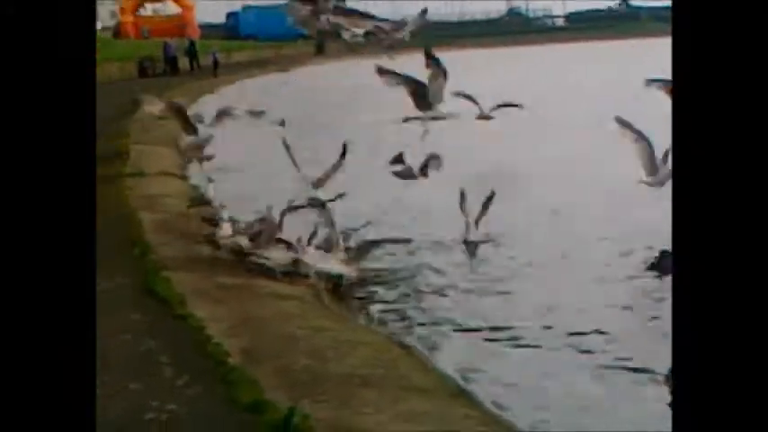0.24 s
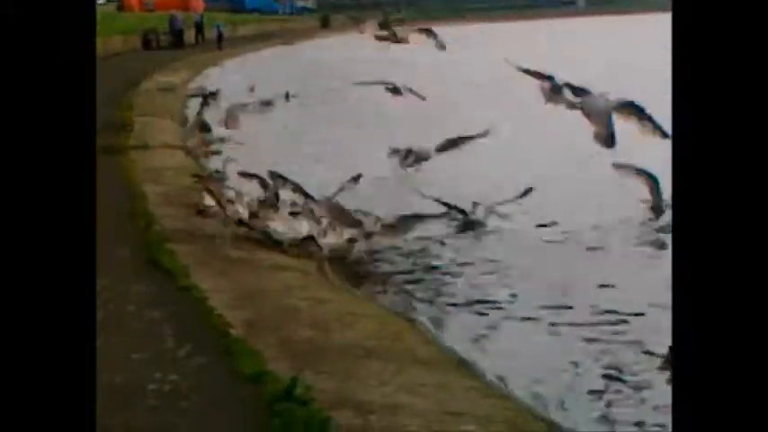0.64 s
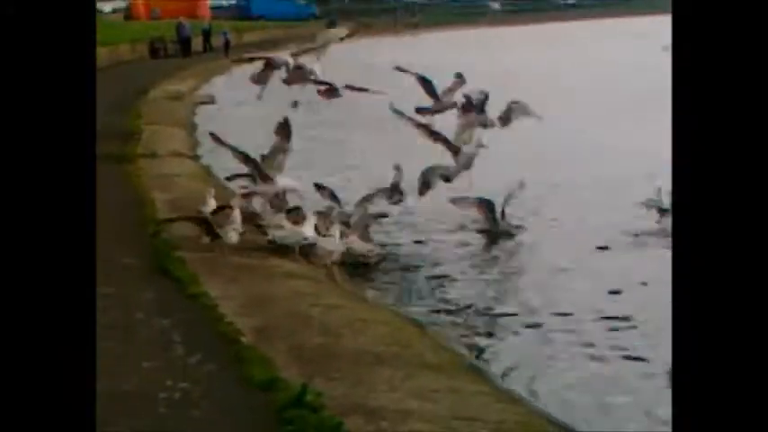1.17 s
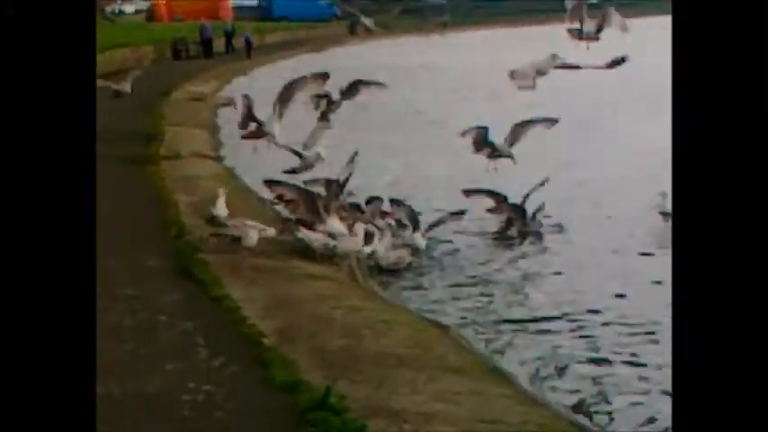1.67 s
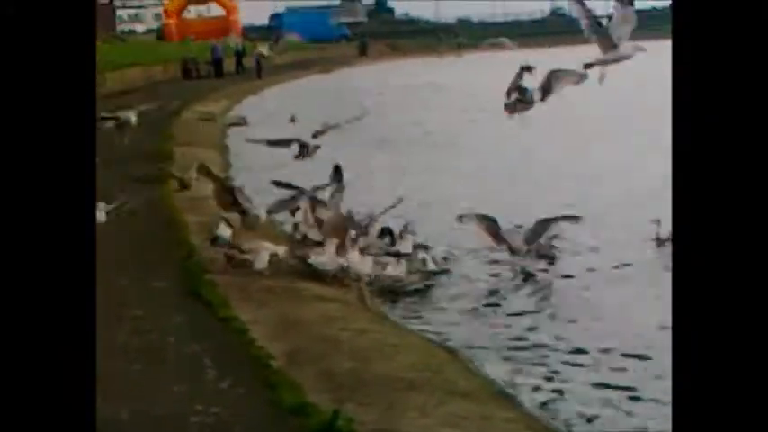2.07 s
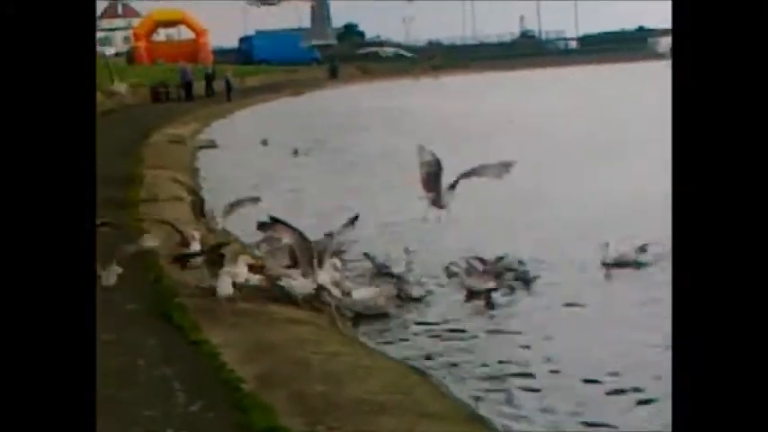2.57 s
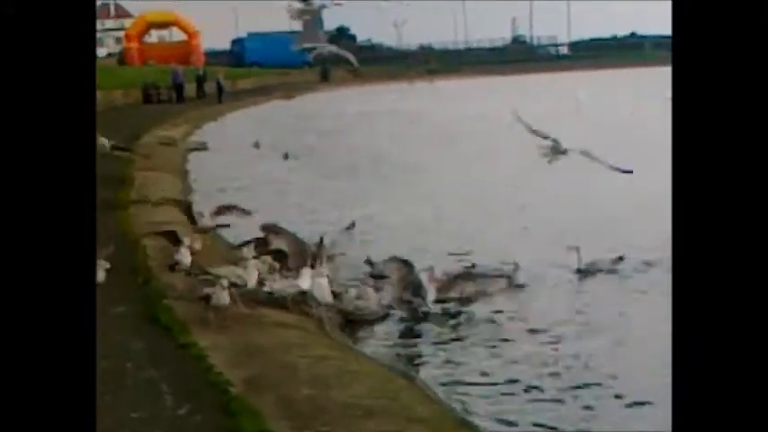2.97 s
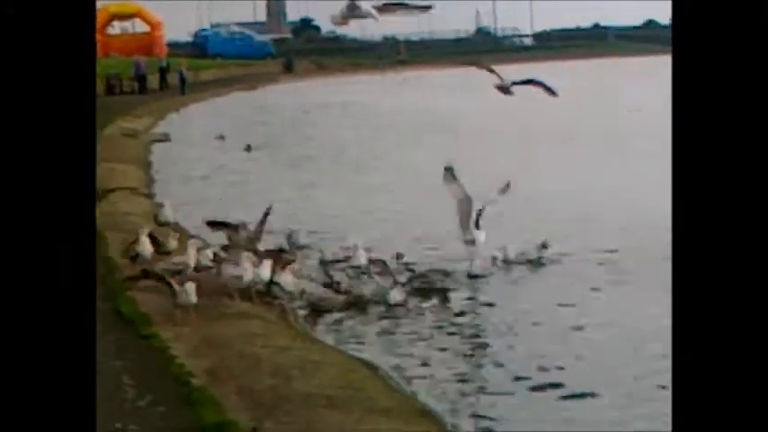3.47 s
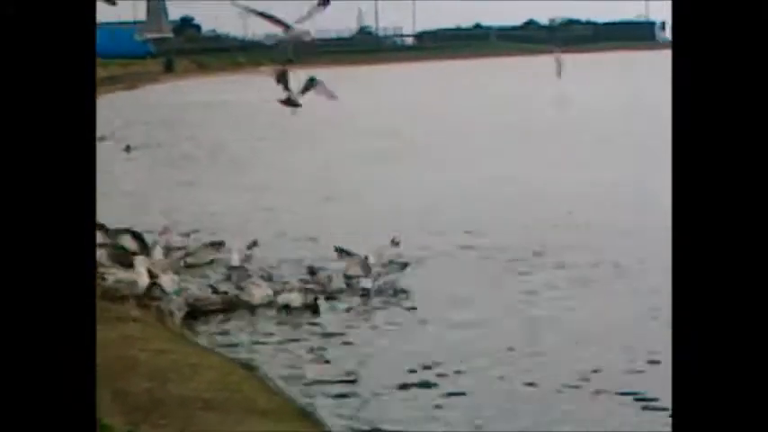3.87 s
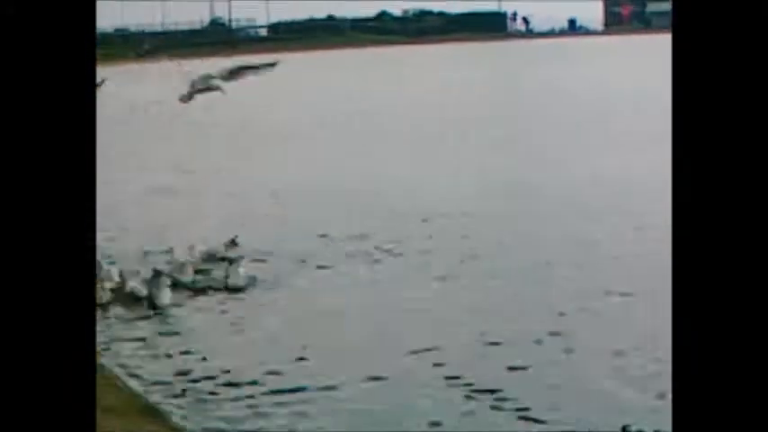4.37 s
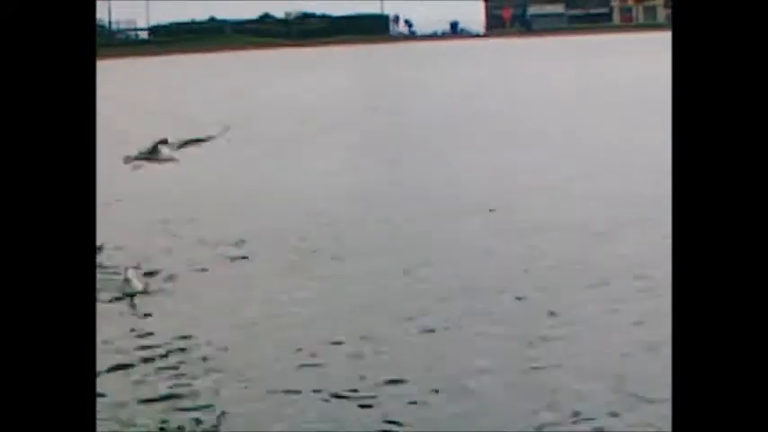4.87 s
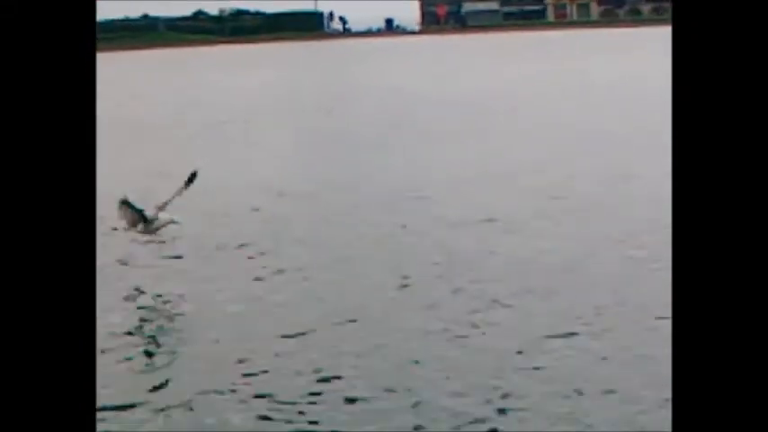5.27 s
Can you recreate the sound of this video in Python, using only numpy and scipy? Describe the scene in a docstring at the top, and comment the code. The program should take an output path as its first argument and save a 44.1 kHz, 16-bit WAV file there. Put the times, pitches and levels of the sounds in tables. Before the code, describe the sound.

Gulls squabble in harsh, raspy squawks and bending wails at a windy lakeside, while gusts rumble and thump heavily on the microphone.

```python
"""Edge of a lake, microphone out in the wind: a flock of gulls squabbles over food above splashing water.
Squawks and wails are sums of partials that break into half tones and rasp; young birds whistle in thin,
nearly pure notes, over a faint, fast warbling tone. Spray, wash and the further flock are coloured noise.
Gusts rumble and flutter as noise and thump on the microphone as single pushes. The birds bounce off the
water and echo from the far bank."""
import sys
import numpy as np
from scipy import signal
from scipy.fft import rfft, irfft, next_fast_len
from scipy.io import wavfile
from scipy.ndimage import uniform_filter1d

SR = 44100
rng = np.random.default_rng(int(sys.argv[2]) if len(sys.argv) > 2 else 0)


def wav_record(signal):
    """Record a signal, one row per channel, as 16-bit PCM in the file named by sys.argv[1]."""
    frames = np.transpose(np.atleast_2d(signal))
    bounded = np.clip(frames, -1, 1)
    # unit amplitude maps onto the largest positive 16-bit level
    quanta = np.round(bounded * 32767).astype(np.int16)
    wavfile.write(sys.argv[1], SR, quanta)


N = 243431
TIME = np.arange(N) / SR

# wind on the microphone between gusts, before BREEZE_DB: time_s, level_db
BREEZE_LEVEL = [(0.0, -19), (0.37, -22.5), (0.57, -26), (1.14, -24.5), (1.83, -23), (1.98, -23),
                (2.2, -31.5), (2.34, -18), (2.54, -22), (2.74, -22.5), (3.38, -21.5), (3.98, -35.5),
                (4.15, -30), (4.49, -23), (4.7, -29), (5.24, -29.5), (5.41, -21), (5.52, -32)]
# gusts, before PUFF_DB: start_s, length_s, level_db
GUSTS = [(0.009, 0.0505, -15.5), (0.203, 0.201, -13), (0.426, 0.0807, -13), (0.528, 0.054, -13.5),
         (0.756, 0.1428, -14), (0.958, 0.091, -14.5), (1.245, 0.0358, -17.5), (1.391, 0.18, -16.5),
         (1.572, 0.052, -15), (1.788, 0.1476, -13), (2.241, 0.0424, -13), (2.323, 0.218, -15),
         (2.601, 0.16, -13.5), (2.902, 0.083, -16), (3.011, 0.0278, -7.5), (3.281, 0.302, -18.5),
         (3.823, 0.0405, -16), (4.324, 0.192, -15.5), (5.241, 0.1106, -14)]
BREEZE_DB, PUFF_DB = 1.5, 0  # gain of the breeze and of the gusts
PUFF_RISE_S, PUFF_FALL_S = 0.0067, 0.02966
# spectrum of the large eddies: frequency_hz, relative_level_db
RUMBLE_COLOUR = [(8.8, -41.5), (15, 6.5), (33, 2), (73, 0.5), (300, -23.5), (390, -45), (660, -120)]
# spectrum of the small eddies: frequency_hz, relative_level_db
FLUTTER_COLOUR = [(60,1),(115,7),(230,-1),(340,-6.5),(450,-14.5),(700,-20),(1400,-39.5),(3000,-85.5)]
# birds thrashing in the water, before the gain in spray(): time_s, level_db
SPRAY_LEVEL = [(0.04, -74.5), (0.11, -75), (0.63, -72.5), (0.74, -68.5), (1.06, -81), (1.12, -71),
               (1.88, -65.5), (2.65, -88), (2.68, -75), (2.96, -95.5), (3.86, -77), (3.93, -86),
               (4.71, -73), (5.19, -82), (5.22, -63.5), (5.5, -66.5)]
# spectrum of the spray: frequency_hz, relative_level_db
SPRAY_SPECTRUM = [(900,10.5),(2300,15.5),(4000,16),(6000,7.5),(8500,4),(11000,-3.5),(15500,-9)]
# wash of water and the further flock: time_s, level_db
SHORE_LEVEL = [(0,-43),(.6,-40),(1,-48),(1.5,-35.5),(2.2,-45),(2.6,-43),(3.1,-51.5),(3.5,-39),(3.85,-39.5),(4.3,-44),(4.8,-37),(5.1,-44.5),(5.52,-33.5)]
# spectrum of the wash and the further flock: frequency_hz, relative_level_db
SHORE_SPECTRUM = [(200,-16),(500,2),(900,-2.5),(1400,8),(2300,2.5),(3200,-8),(4200,-20),(5500,-37),(9000,-35)]
# throat colour shared by all the gulls: frequency_hz, relative_level_db
THROAT_COLOUR = [(500,-37),(900,-17.5),(1200,-3.5),(1600,4.5),(2600,-0.5),(3600,-7),(4300,-15),(4900,-26.5),(5600,-22),(6600,-40),(8000,-34.5),(10000,-52),(15000,-59.5)]
# how the voice breaks up: strain_0_to_1, half_tones_db, roughness_0_to_1
VOICE_BREAKUP = [(0,-33,.02),(.3,-17,.07),(.5,-5,.13),(.7,0,.3),(1,0,.8)]
# squawks: start_s, length_s, time_to_crest_s, crest_pitch_hz, late_pitch_hz (before the droop),
# crest_level_db, level_change_after_crest_db, crest_strain_0_to_1, late_strain_0_to_1,
# throat_resonance_hz, treble_db
SQUAWKS = [ (0, 0.0645, 0.00366, 1375, 1184, -25.5, -26.5, 0.81, 1, 2812, 3),
           (0.33, 0.163, 0.0762, 1249, 1213, -29, -10.5, 0.49, 0.58, 2470, 2),
           (0.496, 0.184, 0.012, 1164, 1144, -28, -7, 0.43, 1, 2123, -1.5),
           (0.618, 0.085, 0.0424, 1477, 1383, -31, -5, 0.8, 0.75, 2494, 1),
           (0.689, 0.0908, 0.0344, 1571, 1325, -25, 4, 0.41, 0.39, 2820, 6.5),
           (0.774, 0.0412, 0.0222, 1035, 1089, -25.5, -6.5, 0.55, .15, 1983, 3),
           (1.061, 0.028, 0.0125, 1427, 1760, -28, -3.5, 0.36, 0.73, 1490, 1.5),
           (1.079, 0.0695, 0.0043, 1264, 1031, -32, -1, 0.07, 0.12, 1774, 0.5),
           (1.2, .163, 0.0435, 1545, 1454, -25.5, 3, 0.47, 0.5, 1791, 4),
           (1.3, 0.1925, 0.0543, 1131, 1008, -26, 2, 0.49, 0.71, 2205, 4.5),
           (1.363, 0.033, 0.0136, 1081, 1085, -25, -14.5, 0.1, .4, 2200, -10.5),
           (1.391, 0.1175, 0.0107, 1406, 1449, -24, -2, 0.38, 0.69, 3203, -1),
           (1.473, 0.1014, 0.00755, 1305, 1458, -19, -10.5, 0.65, 0.48, 2526, 2),
           (1.531, 0.1745, 0.0798, 1380, 1347, -27, 0, 0.8, 0.88, 1843, 2.5),
           (1.661, 0.028, 0.0081, 1900, 1600, -22.5, -3, 0.38, .5, 1810, -12.5),
           (1.727, 0.183, 0.029, 1377, 1390, -25, -4, 0.53, 0.66, 1667, 2.5),
           (1.927, 0.0617, 0.01125, 1282, 1253, -22, 0.5, 0.47, 0.71, 1920, 6),
           (1.968, 0.2309, 0.0857, 1478, 1458, -25, -2.5, 0.79, 0.95, 2535, -3),
           (2.238, 0.0462, 0.0157, 1409, 1374, -25.5, -15, 0.76, 0.6, 2700, -5),
           (2.267, 0.173, 0.0281, 1295, 1195, -28, -5.5, 0, 0.44, 2803, 1),
           (2.338, 0.062, 0.022, 1810, 1481, -34, -11, 0.16, .1, 1730, -11),
           (2.65, 0.0668, 0.0124, 1568, 1330, -26.5, 6.5, 0.26, 0.14, 1486, 0),
           (2.666, 0.0357, 0.0143, 1405, 1468, -25, -9.5, 0.53, 0.26, 2332, -0.5),
           (2.691, 0.1213, 0.0225, 1293, 1209, -30.5, 2.5, 0.35, 0, 2304, -1),
           (3.238, 0.1044, 0.01106, 1240, 1026, -33.5, -1, 0.4, 0.21, 1150, -12.5),
           (3.968, 0.075, 0.00434, 1272, 1005, -32.5, -6.5, 0, 0, 1600, -8.5),
           (4.255, 0.025, 0.0064, 1087, 1221, -35, -6, 0.5, 0.28, 1480, -16.5),
           (4.282, 0.0223, 0.00644, 1334, 1382, -29.5, 6, 0.76, 0.74, 1390, -16),
           (4.302, 0.0459, 0.0056, 1565, 1459, -25.5, -3.5, 0.26, 0.24, 1500, -18),
           (4.437, 0.01985, 0.0142, 1059, 1080, -26.5, 8.5, 0.54, 0.06, 2070, -9),
           (4.625, 0.092, 0.034, 1695, 1591, -31.5, -4, .9, 0.77, 1580, 7),
           (4.937, 0.0243, 0.0115, 1309, 1396, -35, -6.5, 0, .2, 1350, -15),
           (5.178, 0.0628, 0.0268, 1217, 1143, -31, 10, 0, 0.16, 2724, -6),
           (5.209, 0.0786, 0.02314, 1172, 1217, -23, 3, 0.81, 0.89, 2540, -5),
           (5.274, 0.0565, 0.009, 1558, 1459, -20, -7, 0.86, 0.51, 2990, -7.5),
           (5.31, 0.195, 0.0456, 1243, 1134, -28, 1, 0.98, 0.84, 2355, -7),
           (5.386, 0.039, 0.00533, 1310, 1131, -27.5, 8, 0.39, 0.64, 1197, 4.5),
           (5.387, 0.087, 0.0573, 1741, 1773, -23, 0, 0.31, 0.27, 1600, 6.5),
           (5.417, 0.0264, 0.0111, 1487, 1561, -14.5, -10, 0.47, 0.49, 1410, -26.5)]
SCOOP, SWELL_DB = 0.07193, 6  # share of the pitch and level gained on the way to the crest
# the ending: its longest length, and the level and share of pitch lost
RELEASE_S, RELEASE_DB, DROOP = 0.0208, 7, 0.061
# eddies that thump the microphone, before the gain in thumps(): start_s, peak_db, length_of_push_s
EDDIES = [(0.014, -2.5, 0.00179), (0.27, -2.5, 0.00203), (0.474, -8, 0.00192), (0.819, -2, 0.00147),
          (0.844, -10, 0.00094), (0.999, -3.5, 0.00233), (1.252, -6, 0.00269), (1.281, -6.5, 0.0035),
          (1.856, 0, 0.00262), (2.15, -3.5, 0.00233), (2.61, -2.5, 0.00185), (2.889, -0.5, 0.0028),
          (2.934, -15.5, 0.00187), (3.011, -5.5, 0.00215), (3.355, -1, 0.00374), (3.426, -3, 0.00205),
          (3.836, -1, 0.0047), (4.469, -4, 0.0028), (4.647, -5.5, 0.0063), (4.979, -13, 0.00243)]
# long wails that bend in pitch: throat_resonance_hz, treble_db,
# rows of (time_s, pitch_hz, level_db, strain_0_to_1)
LONG_WAILS = [ (2540, 2.5, [(.063,1174,-24.5,0.59),(.11,1398,-16,0.55),(.148,1228,-15.5,0.43),(.175,1188,-24,0.47),(.197,1223,-16.5,0.45),(.255,1185,-20.5,0.4),(.275,1190,-24.5,0.76),(.328,1067,-22.5,0.42),(.355,1122,-34,0.3),(.38,1075,-18.5,0.29),(.398,991,-28,0.41)]),
              (2470, -2, [(1.18,1220,-39,0.72),(1.207,1184,-18,0.75),(1.232,1274,-33.5,0.89),(1.253,1255,-17.5,0.46),(1.273,1309,-42,0.42),(1.283,1194,-14.5,0.2),(1.305,1283,-34,0.68),(1.368,1253,-20.5,0.67),(1.39,1222,-16.5,0.2)]),
              (2700, 4.5, [(1.712,1310,-27,0.82),(1.81,1383,-24.5,0.56),(1.86,1333,-22,0.46),(1.91,1327,-20.5,0.54),(1.975,1226,-27,0.82)]),
              (1600, -1.5, [(5.2,1498,-29,.2),(5.228,1600,-22.5,0.53),(5.282,1558,-23,0.59),(5.31,1690,-28,0.55),(5.35,1661,-21,0.54),(5.378,1531,-16,0.46),(5.388,1530,-29.5,0.6)]),
              (2080, -11.5, [(4.471,1127,-19,0),(4.495,1141,-15,0),(4.52,1087,-20.5,0),(4.56,1144,-24,0),(4.62,1180,-30,0.34),(4.652,1184,-22.5,0.43),(4.69,1152,-27,0),(4.742,1023,-30,0)])]
# young birds' whistles: start_s, length_s, first_pitch_hz, last_pitch_hz, warble_share_of_pitch,
# level_db, level_change_db, overtone_db
YOUNG_WHISTLES = [ (0.376, 0.022, 4554, 4683, 0, -39.5, -5, -31.5),
                  (0.412, 0.1827, 2832, 2600, 0.0058, -32.5, 1, -22),
                  (0.843, 0.0254, 3624, 3540, 0.012, -27, -5, -39),
                  (0.864, 0.0389, 2696, 2837, 0, -23.5, -4, -17),
                  (0.897, 0.0897, 4480, 4500, 0.06, -42, -3, -25),
                  (1.111, 0.0186, 3208, 3120, 0.0078, -30, 0.5, -41),
                  (1.129, 0.0192, 2726, 2500, 0, -28, -3, -19.5),
                  (1.55, 0.075, 4057, 4050, 0.0047, -38.5, -2, -23.5),
                  (1.633, 0.059, 3280, 3580, 0.014, -33.5, -1.5, -27.5),
                  (2.11, 0.221, 3009, 2896, 0.0028, -35, -4.5, -22.5),
                  (3.485, 0.0359, 2075, 2130, 0.0065, -33.5, -1, -26),
                  (3.52, 0.024, 2760, 2830, 0.0051, -35, -5.5, -16),
                  (3.542, 0.178, 2788, 2790, 0.00019, -36, -18, -19),
                  (3.671, 0.1747, 3404, 3300, 0.009, -50, 14.5, -33.5),
                  (4.31, 0.042, 4060, 3800, 0.0073, -50, 0, -30),
                  (4.976, 0.036, 3092, 3090, 0.00079, -44.5, 6.5, -23),
                  (4.996, 0.0306, 2540, 2470, 0.005, -36.5, -5.5, -14),
                  (5.002, 0.0411, 3696, 3725, 0.0107, -45.5, 12, -23.5),
                  (5.318, 0.0662, 3586, 3630, 0.009, -37.5, 5.5, -36)]
WARBLE_HZ = 19.13
PEEP_EDGE_S, PEEP_EDGE_DB = 0.0063, 21  # soft start and end: length and level lost
# a faint, fast warbling tone: columns as in YOUNG_WHISTLES
WARBLING_TONE = (1, 1.0823, 865.5, 791, 1, -42.5, 5.5, -29.5)
# squawks that stutter: columns as in SQUAWKS
CHATTERED_SQUAWKS = [(3.996, .22, .035, 1406, 1267, -34.5, -1.15, 0.366, 0.49, 2510, 1)]
# beats of the chatter: start_s, length_s
CHATTER_BEATS = [(4.002, 0.027), (4.019, 0.0248), (4.042, 0.0289), (4.065, 0.063), (4.128, 0.0363),
                 (4.175, 0.0272)]
# a far bird's thin, arched whistle: time_s, pitch_hz, level_db
FAR_BIRD = [(5.044, 4370, -55), (5.07, 5070, -67), (5.125, 4940, -66), (5.19, 4480, -71.5)]
PEAK_LIMIT, TOP_HZ = .82, 15700  # recorder: size no peak exceeds on rounding (full scale 1), upper cutoff


def undb(db):
    """Decibels to gain."""
    return 10 ** (np.asarray(db) / 20)


def unit(x):
    """Scale to rms 1."""
    return x / np.sqrt(np.mean(x ** 2) + 1e-18)


def curves(rows, t):
    """Each column of a table, joined by straight lines at the times (or other first column) t."""
    s, *columns = np.transpose(rows)
    return [np.interp(t, s, c) for c in columns]


def gain_at(points, hz):
    """Gain of a (Hz, dB) spectrum, straight over log frequency."""
    f, db = np.transpose(points)
    return undb(np.interp(np.log(hz + 1e-9), np.log(f), db))


def noise(response, size):
    """Noise of rms 1 whose spectrum follows response(Hz)."""
    n = next_fast_len(size)
    hz = np.arange(n // 2 + 1) * SR / n
    spectrum = rfft(rng.standard_normal(n)) * response(hz)
    return unit(irfft(spectrum, n)[:size])


def coloured(points):
    """Noise over the whole scene with a (Hz, dB) spectrum."""
    return noise(lambda f: gain_at(points, f), size=N)


def waver(rate_hz, size):
    """Random wavering of rms 1, mostly slower than rate_hz."""
    return noise(lambda f: 1 / (1 + (f / rate_hz) ** 4), size=size)


def wind_level():
    """Level of the wind in dB: gusts rise out of the breeze, hold and fall away."""
    gain = undb(curves(BREEZE_LEVEL, TIME)[0] + BREEZE_DB)
    for start_s, length_s, db in GUSTS:
        rise = np.clip((TIME - start_s) / PUFF_RISE_S, 0, 1)
        fall = np.clip((start_s + length_s - TIME) / PUFF_FALL_S, 0, 1)
        gain = np.maximum(gain, undb(db + PUFF_DB) * rise * fall)
    return 20 * np.log10(gain)


def wind(rumble_db=-1, flutter_db=-10, steepness=0.615, eddy_db=3.0):
    """Large eddies rumble; small ones tear off in bursts and flutter higher up, the more so in a strong gust."""
    gust_db = wind_level()
    rumble = coloured(RUMBLE_COLOUR) * undb(rumble_db)
    bursts = undb(eddy_db * waver(39, size=N))
    flutter = unit(coloured(FLUTTER_COLOUR) * bursts)
    extra_db = steepness * (gust_db - np.mean(gust_db))  # dB of flutter per dB of gust
    return (rumble + flutter * undb(flutter_db + extra_db)) * undb(gust_db)


def spray(spray_db=19, drop_db=3.5):
    """Drops from wings and feet crackle: bright noise, wavering fast in level."""
    crackle = unit(coloured(SPRAY_SPECTRUM) * undb(drop_db * waver(180, size=N)))
    return crackle * undb(curves(SPRAY_LEVEL, TIME)[0] + spray_db)


def shore_wash(lap_db=3.0):
    """Water laps along the shore and the further flock blurs into it: noise, wavering slowly in level."""
    wash = coloured(SHORE_SPECTRUM) * undb(lap_db * waver(12.94, size=N))
    return wash * undb(curves(SHORE_LEVEL, TIME)[0])


def span(rows, edge_s=0.004):
    """Sample numbers of one call, and the gate that opens and shuts it."""
    i = np.arange(int(rows[0][0] * SR), min(int(rows[-1][0] * SR), N))
    from_edge = np.minimum(i - i[0], i[-1] - i)
    return i, np.sin(np.pi / 2 * np.clip(from_edge / (edge_s * SR), 0, 1))


def throat_gain(f, throat_hz, treble_db, width_hz=500, boost_db=10, shadow=0.62):
    """The shared throat colour, this bird's own resonance, and the treble lost when it faces away."""
    resonance = 1 + undb(boost_db) / (1 + (2 * (f - throat_hz) / width_hz) ** 2)
    turned_db = treble_db * np.clip((f - 2500) / 1000, 0, 1)
    # the highest treble loses still more, where there is a loss
    shadow_db = shadow * min(treble_db, 0) * np.clip((f - 4200) / 1200, 0, 1)
    return gain_at(THROAT_COLOUR, f) * resonance * undb(turned_db + shadow_db)


def cry(throat_hz, treble_db, rows, rasp_db=-1, fade_db=3, easy_db=4, press_db=9, push=0.76,
        rattle_db=2, growl_db=3.5, growl_share=.19):
    """A gull's voice: under strain every other cycle weakens (half tones), then cycles turn irregular and rasp."""
    i, gate = span(rows)
    n = len(i)
    hz, db, strain = curves(rows, i / SR)
    half_db, rough = curves(VOICE_BREAKUP, strain)

    def throat(f):
        """This bird's throat as a filter."""
        return throat_gain(f, throat_hz, treble_db)

    # the pitch quavers slowly and jitters from cycle to cycle
    quaver = (.002 + .018 * rough) * waver(45, size=n)
    jitter = .06 * rough * waver(350, size=n)
    hz = hz * (1 + quaver + jitter)
    phase = 2 * np.pi * np.cumsum(hz) / SR
    k = np.arange(1, 19)[:, None] / 2  # harmonics and the half tones between them
    # each partial fades on its own as the bird turns and flaps above the water
    fading = undb(fade_db * (1.0 + strain) * np.array([waver(32, size=n) for _ in k]))
    half_tones = np.where(k % 1 > 0, undb(half_db), 1)
    partials = throat(k * hz) * half_tones * fading
    # a pressed voice loses its fundamental, and a loud push goes mostly into the overtones
    fundamental_db = easy_db - press_db * strain - push * (db - np.mean(db))
    partials = partials * np.where(k == 1, undb(fundamental_db), 1)
    offsets = rng.uniform(0, 2 * np.pi, k.shape)
    power = uniform_filter1d(np.sum(partials ** 2, axis=0) / 2, size=900)
    voice = np.sum(partials * np.sin(k * phase + offsets), axis=0) / np.sqrt(power)
    # air torn by the membranes, in puffs at the half-tone rate
    rasp = noise(throat, size=n) * (1 + np.cos(phase / 2)) * rough * undb(rasp_db)
    # a rough voice comes in uneven bursts, and a second, slower vibration chops it into a growl
    growl_hz = growl_share * hz * (1 + waver(41, size=n) / 10)
    growl = np.cos(2 * np.pi * np.cumsum(growl_hz) / SR)
    bursts_db = rattle_db * waver(92, size=n)
    rattle = unit(undb(np.sqrt(rough) * (bursts_db + growl_db * growl)))
    out = np.zeros(N)
    out[i] = (voice + rasp) * rattle * gate * undb(db) / np.sqrt(1 + rough ** 2)
    return out


def arch(start_s, length_s, crest_s, crest_hz, late_hz, db, change_db, strain, late_strain):
    """One squawk scoops up to a crest, moves on and droops, as rows of (s, pitch Hz, level dB, strain 0-1)."""
    t = np.linspace(0, length_s, num=64)
    after_s = max(length_s - crest_s, 1e-3)
    early = np.clip(1 - t / crest_s, 0, 1) ** 2
    late = np.clip((t - crest_s) / after_s, 0, 1)
    ending = np.clip(1 - (length_s - t) / min(RELEASE_S, after_s / 2), 0, 1) ** 2
    hz = (crest_hz + (late_hz - crest_hz) * late) * (1 - SCOOP * early - DROOP * ending)
    level_db = db + change_db * late - SWELL_DB * early - RELEASE_DB * ending
    strains = np.clip(strain + (late_strain - strain) * late, 0, 1)
    return np.column_stack([start_s + t, hz, level_db, strains])


def squawk(row):
    """One arched call in its bird's own throat."""
    *course, throat_hz, treble_db = row
    return cry(throat_hz, treble_db, arch(*course))


def thumps(thump_db=-3, rise=0.463):
    """An eddy hits the microphone: a steep push, then a slower suction; small ones knock, large ones thud."""
    out = np.zeros(N)
    for start_s, db, length_s in EDDIES:
        u = TIME[:SR // 10] / length_s
        push = (1 - np.exp(-(u / rise) ** 2)) * (1 - u) * np.exp(-u)  # turns to suction at u = 1
        start = max(int(start_s * SR), 0)
        out[start:start + len(u)] += undb(db + thump_db) * push / np.max(np.abs(push))
    return out


def whistle(overtone_db, rows, tremble_db=2):
    """A thin, nearly pure, trembling note: a fundamental and two weak overtones."""
    i, gate = span(rows)
    hz, db = curves(rows, i / SR)
    unsteady_hz = hz * (1 + .004 * waver(150, size=len(i)))
    phase = 2 * np.pi * np.cumsum(unsteady_hz) / SR
    tone = sum(undb(overtone_db * k) * np.sin((k + 1) * phase) for k in range(3))
    tremble = tremble_db * waver(71, size=len(i))
    out = np.zeros(N)
    out[i] = np.sqrt(2) * tone * gate * undb(db + tremble)
    return out


def peep(start_s, length_s, first_hz, last_hz, warble, db, change_db, overtone_db):
    """One whistle: a straight glide that warbles, soft at both ends."""
    u = np.linspace(0, 1, num=64)
    t = u * length_s
    glide_hz = first_hz + (last_hz - first_hz) * u
    hz = glide_hz * (1 + warble * np.sin(2 * np.pi * WARBLE_HZ * t))
    edge = np.clip(1 - np.minimum(t, length_s - t) / PEEP_EDGE_S, 0, 1) ** 2
    level_db = db + change_db * u - PEEP_EDGE_DB * edge
    return whistle(overtone_db, np.column_stack([start_s + t, hz, level_db]))


def warbling_tone():
    """A faint, fast warbling tone: its pitch swings between about zero and double, WARBLE_HZ times a second."""
    return peep(*WARBLING_TONE)


def chatter(row):
    """A squawk that stutters: its level swells and sinks in uneven beats."""
    beats = np.zeros(N)
    for start_s, length_s in CHATTER_BEATS:
        beats += np.sin(np.pi * np.clip((TIME - start_s) / length_s, 0, 1))
    return squawk(row) * beats


def far_whistle():
    """A distant bird's thin whistle that arches up in pitch while it fades."""
    return whistle(-11.5, FAR_BIRD)


def lakeside(x, bounce_s=0.0023787, bounce=0.14, t60_s=0.12, echo_db=-18):
    """A bounce off the water, then a faint scattered echo from the far bank, as decaying noise."""
    t = TIME[:SR]
    scatter = noise(lambda f: 1 / (1 + (f / 3500) ** 2), size=SR)
    tail = scatter * undb(-60 * t / t60_s) * (1 - np.exp(-t / 0.048))  # builds up as it decays
    echo = signal.fftconvolve(x, tail / np.linalg.norm(tail))[:N]
    reflection = np.interp(TIME - bounce_s, TIME, x)
    return x + bounce * reflection + undb(echo_db) * echo


def scene():
    """Wind at the microphone, water along the shore, and the gulls above it with their echo."""
    lake = wind() + spray() + shore_wash() + thumps()
    adults = sum(map(squawk, SQUAWKS)) + sum(cry(*wail) for wail in LONG_WAILS)
    adults = adults + sum(map(chatter, CHATTERED_SQUAWKS))
    whistles = sum(peep(*row) for row in YOUNG_WHISTLES) + warbling_tone() + far_whistle()
    return (lake + lakeside(adults + whistles))[None]


def record(dry):
    """The recorder rounds off the largest peaks and cuts the top."""
    rounded = dry / (1 + (dry / PEAK_LIMIT) ** 6) ** (1 / 6)
    return signal.sosfilt(signal.ellip(8, .2, 70, TOP_HZ, fs=SR, output="sos"), rounded)


dry = scene()
out = record(dry)
wav_record(out)
```